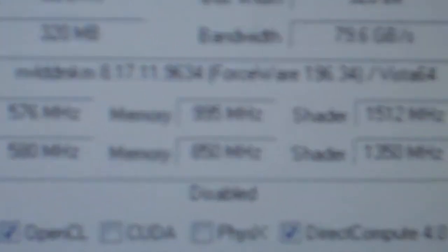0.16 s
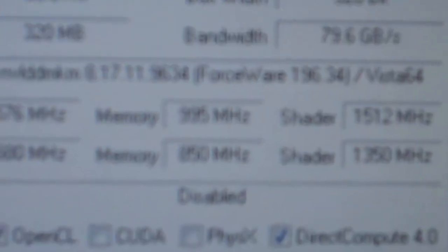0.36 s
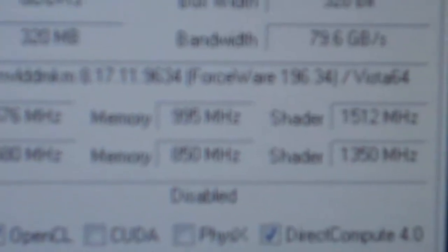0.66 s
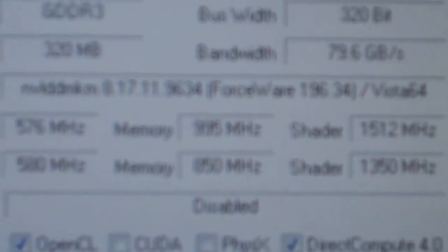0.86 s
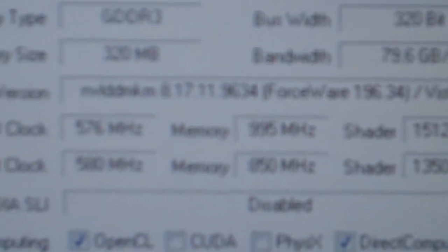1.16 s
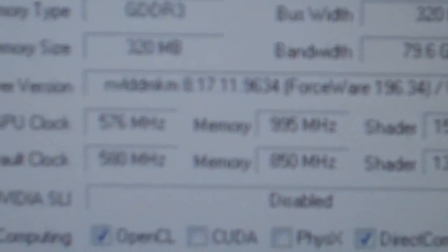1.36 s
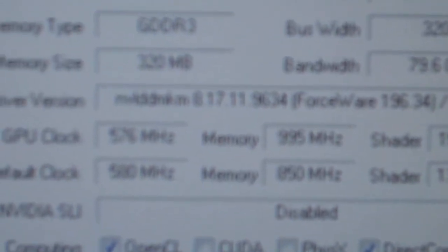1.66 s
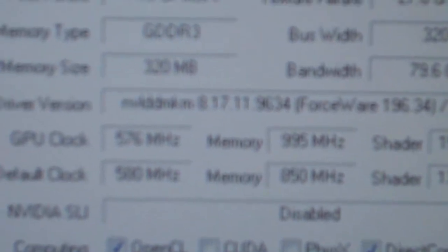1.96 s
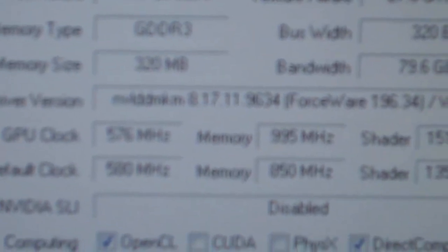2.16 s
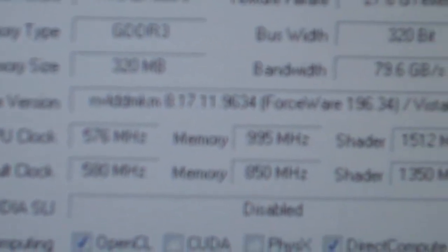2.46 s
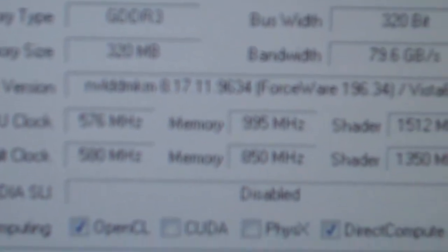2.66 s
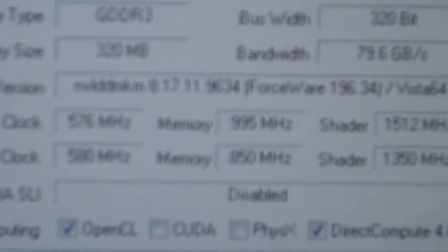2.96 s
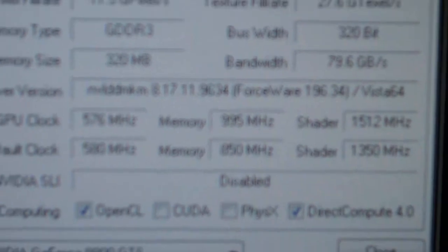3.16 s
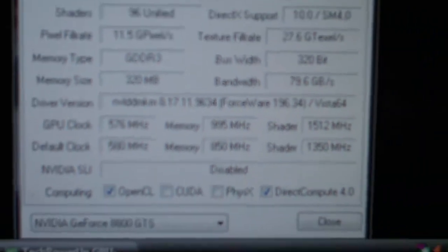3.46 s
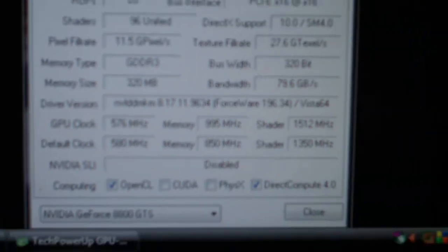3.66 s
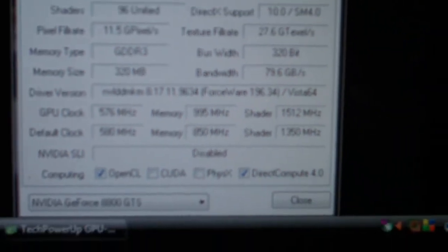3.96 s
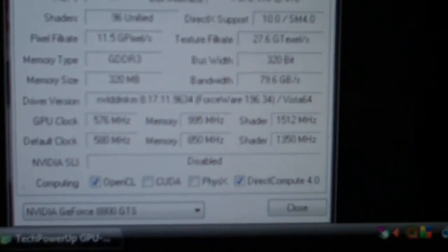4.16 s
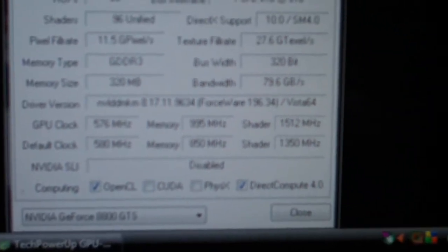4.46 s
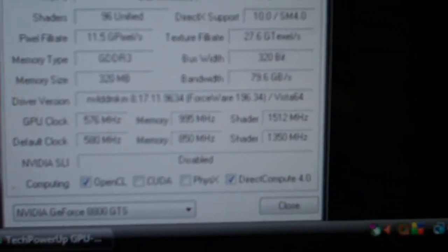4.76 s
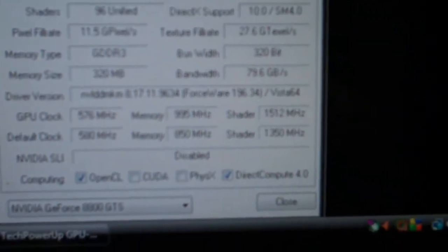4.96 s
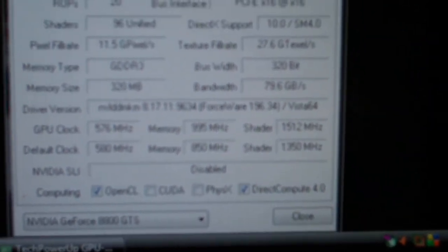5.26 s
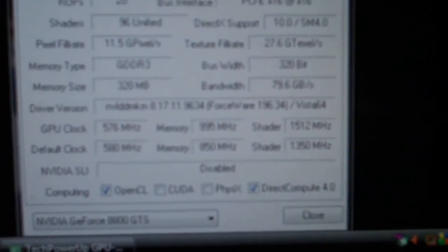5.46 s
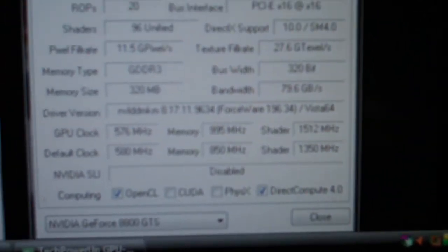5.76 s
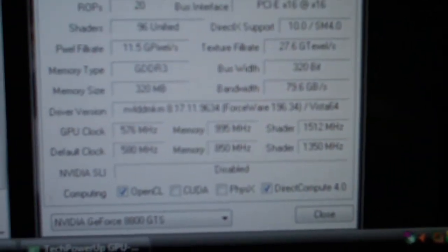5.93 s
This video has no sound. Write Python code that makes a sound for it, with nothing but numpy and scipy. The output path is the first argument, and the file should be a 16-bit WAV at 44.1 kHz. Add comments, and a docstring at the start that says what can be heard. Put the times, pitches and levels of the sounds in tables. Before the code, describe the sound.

Close, nearly mono pickup of a loaded computer in a dry desk setting: airy low rush, wavering rotor drone, slight hollow duct tone around one kilohertz. Over it lie steady electronic hiss and whistling. Fingers snap the camera's plastic shell early on, once or twice during the calm middle, and more often after a short, rough treble zoom whirr, with dull bumps beneath.

```python
"""The fans of a desktop computer under load rush and hum through the case, close to a small hand-held camera.
Filtered noise makes the air, wavering sines the rotor tones. The camera adds hiss, a thin whistle and a fine
buzz of ticks, then for a while a high sine whine, which gives way to the noisy whirr of its zoom.
Fingers make its plastic shell click, as decaying modes, and rumble, as swelling low noise."""
import sys
import numpy as np
from scipy import signal
from scipy.fft import rfft, irfft, next_fast_len
from scipy.io import wavfile
from scipy.ndimage import map_coordinates

SR = 44100
rng = np.random.default_rng(int(sys.argv[2]) if len(sys.argv) > 2 else 0)


def to_wav(sig):
    """Store sig (one row per channel, or 1-D mono) as 16-bit WAV at the path in sys.argv[1].

    Samples outside -1..1 are clipped; the rate is SR.
    """
    pcm = np.clip(np.atleast_2d(sig), -1, 1) * 32767
    pcm = np.round(pcm).astype(np.int16)
    wavfile.write(sys.argv[1], SR, pcm.T)  # frames by channels


N = 268812
T = np.arange(N) / SR  # time of each sample, s
FRAME_HZ = 29.97  # picture rate of the camera


def amp(db):
    """Decibels to gain."""
    return 10 ** (np.asarray(db) / 20)


def unit(x):
    """Scale to rms 1."""
    return x / np.sqrt(np.mean(x ** 2) + 1e-20)


def curve(rows):
    """Join (time, value) rows by straight lines, one value per sample."""
    return np.interp(T, *np.transpose(rows))


def wobble(rate):
    """A smooth random curve around zero, with rate knots a second."""
    knots = rng.standard_normal(int(N * rate / SR) + 4)
    return map_coordinates(knots, [T * rate])


def noise():
    """White noise."""
    return rng.standard_normal(N)


def sine(turns):
    """A sine of rms 1 from its phase in turns."""
    return np.sqrt(2) * np.sin(2 * np.pi * turns)


def filtered(x, response):
    """Multiply the spectrum of x by a response of frequency in Hz."""
    m = next_fast_len(N + SR // 2)
    spectrum = rfft(x, m) * response(np.fft.rfftfreq(m, 1 / SR))
    return irfft(spectrum, m)[..., :N]


def coloured(x, points):
    """Shape x by spectrum points joined on a log frequency axis, then scale to rms 1."""
    f, db = np.transpose(points)
    return unit(filtered(x, lambda hz: amp(np.interp(np.log(hz + 1), np.log(f), db))))


# colour of the air through the case: (frequency [Hz], relative density [dB per Hz])
AIR_COLOUR = [(25, -5), (60, 3), (130, 0.5), (175, -3), (240, -1), (300, -7), (390, -11), (520, -9),
              (800, -14.5), (1400, -19), (1750, -13.5), (2150, -19), (2650, -19.5), (4000, -27.5),
              (7000, -42.5)]
# resonances of the graphics card's air duct: (frequency [Hz], width [Hz], relative level [dB])
DUCT_MODES = [(936, 395, 11.5), (1113, 191, 20.5)]
FLUTTER_DB = .55  # scale of the random level flutter


def airflow(air_db=-47.0, duct_db=-52):
    """Turbulence from the blades, coloured by the case and ringing in the card's duct."""
    def duct(f):
        total = 0
        for k, (centre, width, db) in enumerate(DUCT_MODES):
            resonance = 1j * f * width / (centre ** 2 - f ** 2 + 1j * f * width)
            total = total + amp(db) * resonance * (-1) ** k
        return total

    case_air = amp(air_db) * coloured(noise(), AIR_COLOUR)
    duct_air = amp(duct_db) * unit(filtered(noise(), duct))
    return (case_air + duct_air) * amp(FLUTTER_DB * wobble(7))


# low tones of case fans, drives and mains: (centre frequency [Hz], mid level [dB rms])
CASE_TONES = [(72, -64), (87.5, -65), (111, -64), (120.4, -59), (137.3, -63), (206.6, -64), (221.4, -62),
              (232.8, -62), (241.6, -55.5), (263.1, -60), (309.5, -67), (465.7, -72), (731.5, -71),
              (1172, -67), (1316.5, -73)]
# tones of the seven-bladed card fan: (multiple of the shaft rate, mid level [dB rms])
CARD_FAN_TONES = [(7, -60), (34, -74), (44, -72), (52, -72), (54, -77), (58, -78), (60, -68), (62, -75),
                  (64, -76), (66, -79), (70, -80), (78, -82)]
SHAFT_HZ = 27.69  # centre of the card fan's turning rate


def hum(drift_hz=0.51, waver_db=2, fan_db=0, fan_drift=0.00056):
    """Rotor tones drift a little in pitch and swell as the camera moves through the sound field."""
    def tone(turns, db):
        level = amp(db + waver_db * wobble(2.994))
        return level * sine(turns + rng.random())

    # all card fan tones share one shaft; each case tone drifts on its own
    shaft = np.cumsum(SHAFT_HZ * (1 + fan_drift * wobble(3.02))) / SR
    card = sum(tone(order * shaft, db + fan_db) for order, db in CARD_FAN_TONES)
    case = sum(tone(np.cumsum(hz + drift_hz * wobble(4.23)) / SR, db) for hz, db in CASE_TONES)
    return card + case


# ring of one electronic tick: (frequency [Hz], relative level [dB])
TICK_RING = [(7900, 2.5), (8700, -11), (9400, -2), (10000, 5), (11800, -12)]
TICK_T60_S = .005


def ticks(rate, start):
    """The same tiny decaying ring, rate times a second."""
    age = (T - start) % (1 / rate)
    out = np.zeros(N)
    for k, (hz, db) in enumerate(TICK_RING):
        out += (-1) ** k * amp(db - 60 * age / TICK_T60_S) * np.sin(2 * np.pi * hz * age)
    return out


# colour of the electronic hiss: (frequency [Hz], relative density [dB per Hz])
HISS_COLOUR = [(3000, 0.5), (7300, -3.5), (8600, 9), (10000, 0), (11000, -3), (12000, -1), (14300, -4),
               (15000, -21)]
# whistling electronic tones of steady pitch: (frequency [Hz], mid level [dB rms])
WHISTLE_TONES = [(6387, -79), (7867.2, -57), (14975, -129)]
TICK_HZ = 100  # rate of the fast tick train


def electronics(hiss_db=-58.0, buzz_db=-65, frame_tick_db=2):
    """Even hiss, a buzz of tiny ticks (a fast train and two a picture), and a faintly wavering whistle."""
    hiss = amp(hiss_db) * coloured(noise(), HISS_COLOUR)
    per_frame = ticks(FRAME_HZ, .0066) + ticks(FRAME_HZ, .0129)
    buzz = unit(ticks(TICK_HZ, 0.012) + amp(frame_tick_db) * per_frame)
    whistle = sum(amp(db + 0.82 * wobble(24)) * sine(hz * T) for hz, db in WHISTLE_TONES)
    return hiss + amp(buzz_db) * buzz + whistle


# colour of the noise that differs between the channels: (frequency [Hz], relative density [dB per Hz])
SIDE_COLOUR = [(25, 6), (70, 7), (220, -30), (500, -30), (1200, -44), (2300, -59), (3300, -26.5),
               (14000, -26.5)]


def side_noise(side_db):
    """A trace of steady noise, strongest in the bass and weakest around 2 kHz; each call is independent."""
    return amp(side_db) * coloured(noise(), SIDE_COLOUR)


# colour of the grip's rumble: (frequency [Hz], relative density [dB per Hz])
RUMBLE_COLOUR = [(3, 12), (8, -11), (18, 15.5), (30, 8), (50, -1.5), (100, -20.5), (250, -33), (600, -89)]
REST_DB, TIRE_DB_PER_S = -48, 1.43  # tremor of the hand at the start, and its growth as the arm tires
SHIFT_DB, SHIFT_S = -38, 0.054  # peak rumble of the grip around a firm click, and its Gaussian spread
FIRM_DB, SHIFT_GROWS = -34, 0.27  # body level of a firm click; dB of rumble per dB of that level


def handling():
    """The hand trembles on the camera; around each click the grip shifts and rumbles with its force."""
    power = amp(REST_DB + TIRE_DB_PER_S * T) ** 2
    for s, db, _, _, _, body_db in CLICK_EVENTS:
        swell = np.exp(-.5 * ((T - s) / SHIFT_S) ** 2)
        shift_db = SHIFT_DB + SHIFT_GROWS * (db + body_db - FIRM_DB)
        power = power + (amp(shift_db) * swell) ** 2
    return np.sqrt(power) * coloured(noise(), RUMBLE_COLOUR)


# snaps of the shell under the fingers, the last three columns relative to the level:
# (time [s], level [dB], note of the pressed panel [Hz], panel [dB], treble [dB], body [dB])
CLICK_EVENTS = [(0.0313, -41, 3600, -16, -8, -8), (.129, -24.5, 3180, 4.5, -7.5, -15.5),
                (.175, -45, 2450, -5, 3, -12), (0.188, -55, 2980, -6, -4, -14),
                (.2865, -53.5, 2750, 9.5, -14, -18), (1.4032, -36, 2620, 4.5, -1, -14),
                (2.8519, -28.5, 2520, -17.5, -5, -6.5), (3.7253, -39.5, 2550, 2, -20, -3.5),
                (4.0797, -52, 2800, 6, 0, -17), (4.0923, -46, 3450, 0, 2, -17),
                (4.0968, -37.5, 2600, 6, -5, -3), (4.1974, -34, 2560, -6, 7, -3.5),
                (4.2018, -45.5, 3060, 4, -8, -28), (4.3856, -21.5, 2500, -12.5, -6.5, -9),
                (4.617, -42.5, 3260, -2.5, -25, -1.5), (4.8826, -38, 3100, -3, -22, -12),
                (5.2953, -45, 2830, 7, -16, 5), (5.51, -23.5, 2370, -11.5, -8, -11.5),
                (5.6474, -45.5, 2630, 2, -24, -2), (5.8415, -49, 3220, -16, 3, -7)]
# modes of the shell, from the knock up to the treble: (frequency [Hz], relative level [dB], t60 [s])
SHELL_MODES = [(133, -6, 0.055), (430, 3, 0.012), (920, 0, 0.011), (1450, 4.5, 0.0038),
               (2940, -22.5, 0.024), (3788, -5.5, 0.01), (4364, -1.5, 0.0062), (6360, -0.5, 0.0045),
               (7920, -3.5, 0.0065), (8770, 1.5, 0.0055), (8740, 4.5, 0.0021), (11570, -4, 0.0049),
               (12650, -11, 0.0061), (14500, -13, 0.0045)]
KNOCK_DB, KNOCK_GROWS = -5.5, 0.77  # offset of the modes below 2 kHz, and their dB gain per dB of body
CRACK_T60_S = .018


def clicks(ring_db=12, panel_db=15, panel_t60=0.0072, crack_db=-16, thump_db=11, thump_hz=52, push_db=15):
    """Each snap rings the pressed panel and the shell's modes, cracks, and shoves the whole body once."""
    t = np.arange(SR // 8) / SR

    def ring(hz, db, t60):
        return amp(db - 60 * t / t60) * np.sin(2 * np.pi * hz * t)

    hz, mode_db, t60 = np.transpose(SHELL_MODES)[:, :, None]
    group = np.digitize(hz, [2000, 9000])  # knock, middle, treble
    sign = (-1) ** np.arange(len(hz))[:, None]  # neighbouring modes move the microphone in opposite directions
    flex = 1 - np.exp(-t / .0003)  # soft onset
    push = amp(push_db - 60 * t / .008) * flex
    sway = ring(thump_hz, thump_db, .05)
    out = np.zeros(N + SR)
    for s, db, panel_hz, note_db, treble_db, body_db in CLICK_EVENTS:
        group_db = np.array([KNOCK_DB + KNOCK_GROWS * body_db, 0, treble_db])
        # every snap strikes and tunes the modes a little differently
        colour = group_db[group] + rng.standard_normal(hz.shape)
        pitch = hz * (1 + .012 * rng.standard_normal(hz.shape))
        shell = np.sum(sign * ring(pitch, ring_db + mode_db + colour, t60), axis=0)
        panel = flex * ring(panel_hz, panel_db + note_db, panel_t60)
        crack_level = amp(ring_db + crack_db + treble_db - 60 * t / CRACK_T60_S)
        crack = crack_level * rng.standard_normal(len(t))
        body = amp(body_db) * (push + sway)
        out[round(s * SR):][:len(t)] -= amp(db) * (shell + panel + crack + body)
    return out[:N]


def desk(x, echo_db=-23, t60=0.033):
    """The screen and the desk answer each click faintly, as decaying noise after two milliseconds."""
    t = np.arange(SR // 8) / SR
    tail = rng.standard_normal(len(t)) * amp(-60 * t / t60) * (t > .002)
    tail = tail / np.linalg.norm(tail)
    return x + amp(echo_db) * signal.fftconvolve(x, tail)[:N]


def gates(rate, start, width):
    """Short Gaussian gates of peak 1, rate times a second; width is their spread in seconds."""
    away = ((T - start) * rate + .5) % 1 - .5
    return np.exp(-.5 * (away / rate / width) ** 2)


# level of the high whine before its dips: (time [s], level [dB rms])
WHINE_LEVEL = [(.21, -100), (.217, -57), (.278, -60), (.285, -53.5), (3.08, -53.5), (3.087, -100)]
WHINE_HZ = 13186.8


def lens_whine(gap_depth=0.84):
    """A high sine whine that dips once a picture and stops as the zoom motor starts to whirr."""
    dips = np.minimum(1, 1.6 * gates(FRAME_HZ, 0.014, 0.0012))
    gate = 1 - np.clip(gap_depth, 0, 1) * dips
    return amp(curve(WHINE_LEVEL)) * gate * sine(WHINE_HZ * T)


# level of the lens motor before its roughness: (time [s], level [dB])
ZOOM_LEVEL = [(3.05, -90), (3.15, -69), (3.33, -72), (3.42, -61.5), (3.68, -63), (3.8, -92)]
# colour of the motor's whirr: (frequency [Hz], relative density [dB per Hz])
WHIRR_COLOUR = [(5000, -34), (7500, -15), (8600, 1), (9400, 11), (10400, 1), (11500, -2), (14000, -23)]
ZOOM_ROUGH_DB = 3.5  # scale of the random level roughness


def zoom_motor(zoom_db=0):
    """The zoom motor whirrs as a band of treble noise with a rough, uneven level."""
    level_db = curve(ZOOM_LEVEL) + zoom_db + ZOOM_ROUGH_DB * wobble(37)
    return amp(level_db) * coloured(noise(), WHIRR_COLOUR)


def scene(side_db=-66):
    """One microphone feeds both channels; a trace of steady noise, independent in each, is added."""
    computer = airflow() + hum()
    camera = electronics() + handling() + desk(clicks()) + lens_whine() + zoom_motor()
    mono = computer + camera
    return np.array([mono + side_noise(side_db) for channel in range(2)])


TOP_HZ = 15000  # band limit of the camera


def record(dry):
    """The camera cuts steeply above its band limit."""
    return filtered(dry, lambda hz: 1 / np.sqrt(1 + (hz / TOP_HZ) ** 120))


dry = scene()
out = record(dry)
to_wav(out)
```